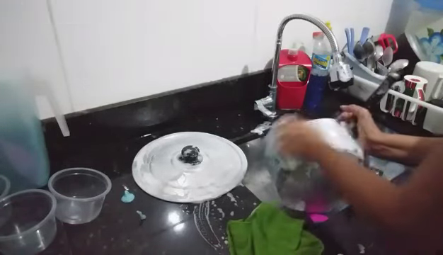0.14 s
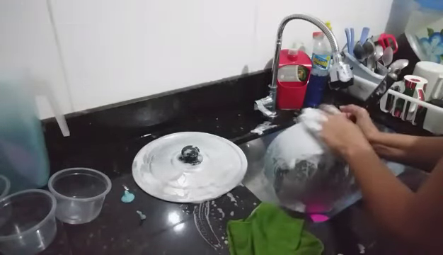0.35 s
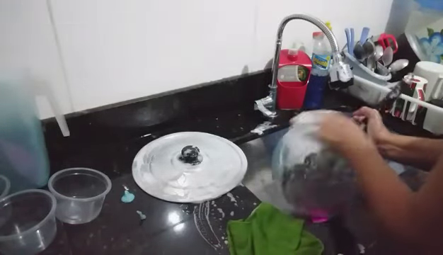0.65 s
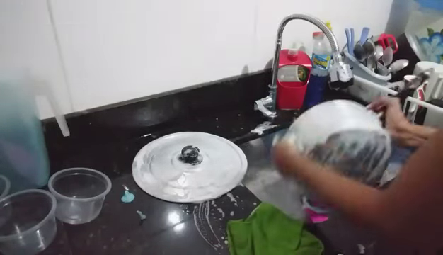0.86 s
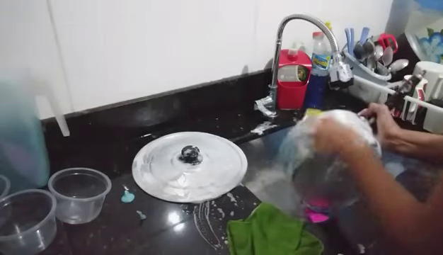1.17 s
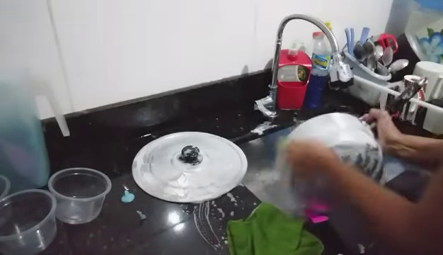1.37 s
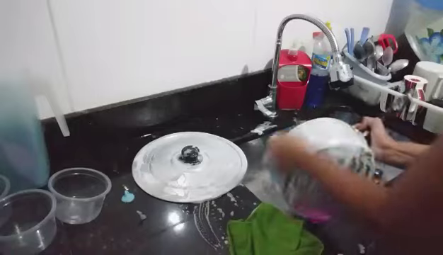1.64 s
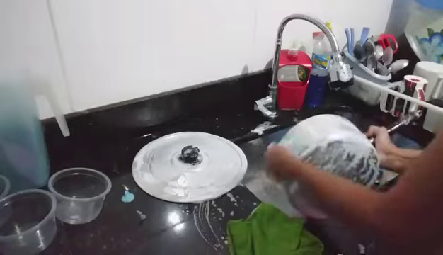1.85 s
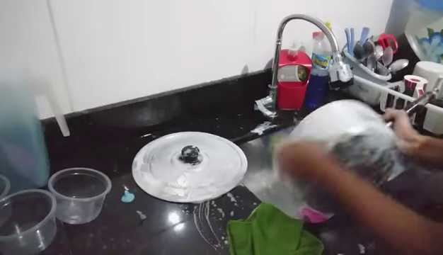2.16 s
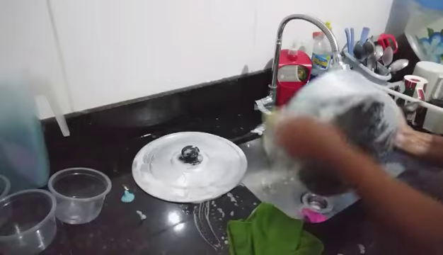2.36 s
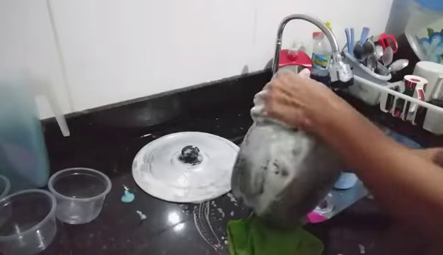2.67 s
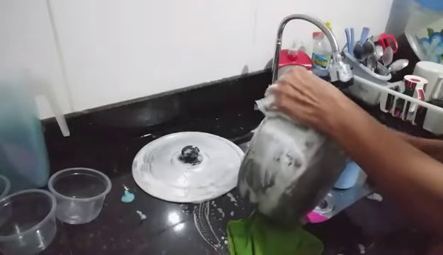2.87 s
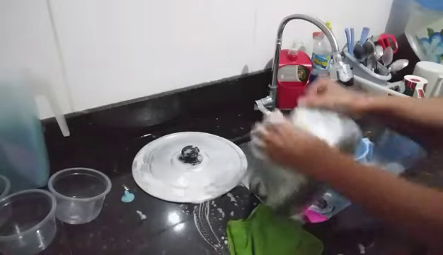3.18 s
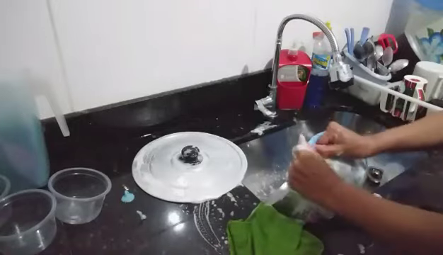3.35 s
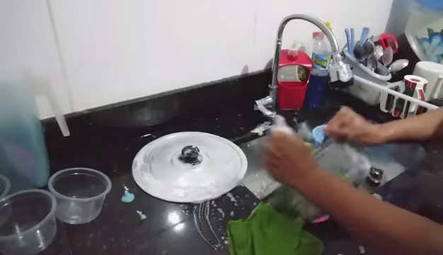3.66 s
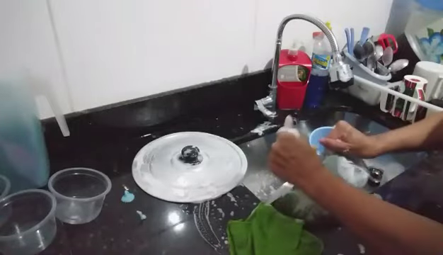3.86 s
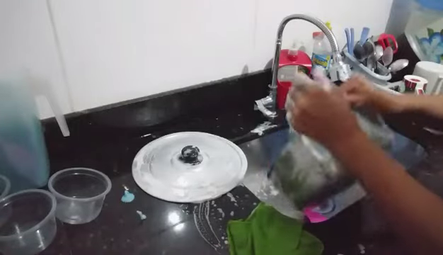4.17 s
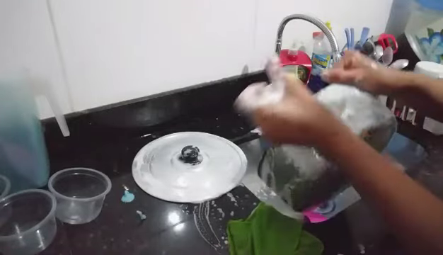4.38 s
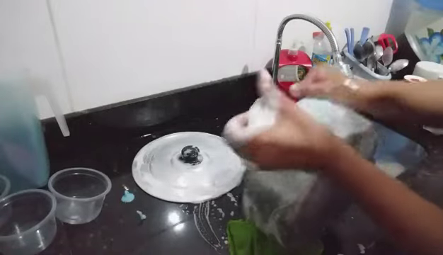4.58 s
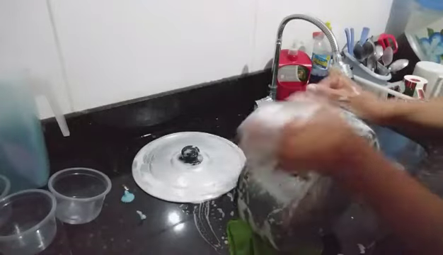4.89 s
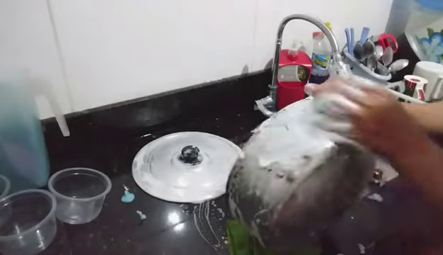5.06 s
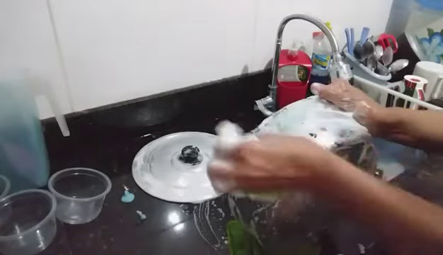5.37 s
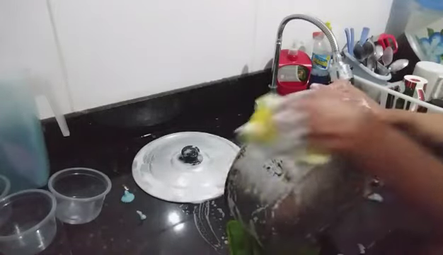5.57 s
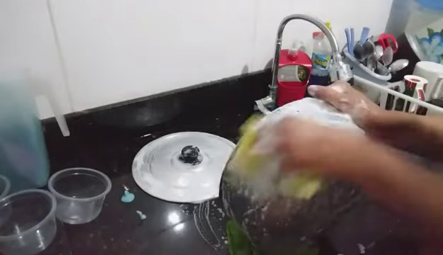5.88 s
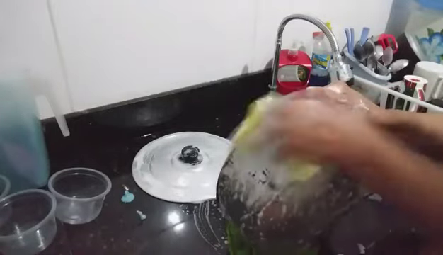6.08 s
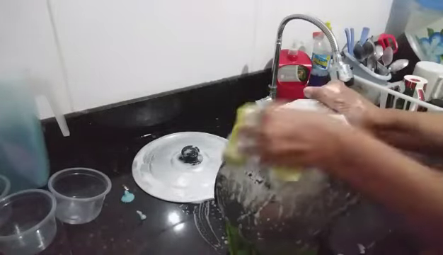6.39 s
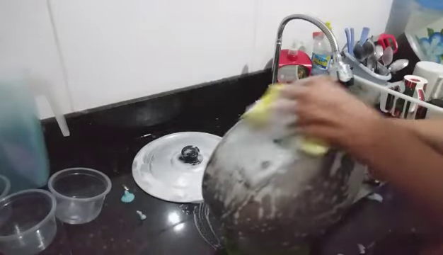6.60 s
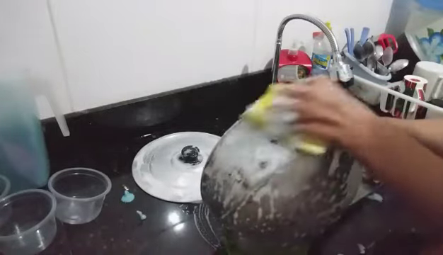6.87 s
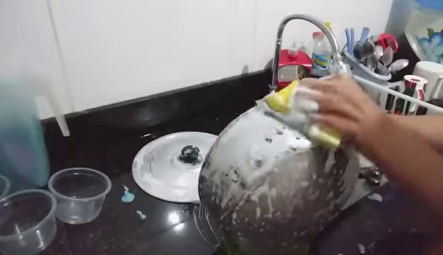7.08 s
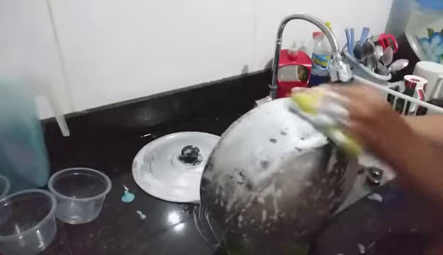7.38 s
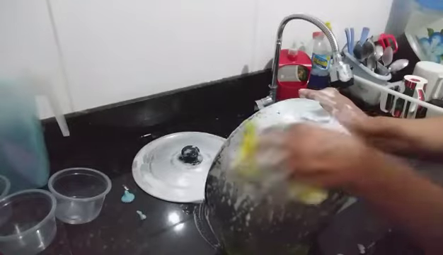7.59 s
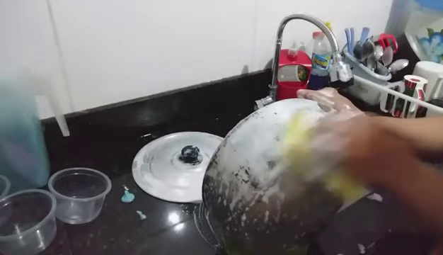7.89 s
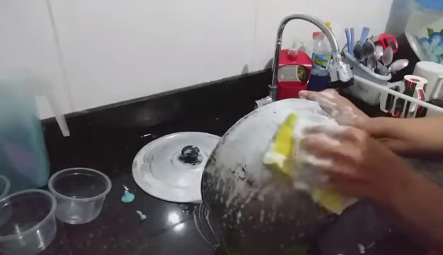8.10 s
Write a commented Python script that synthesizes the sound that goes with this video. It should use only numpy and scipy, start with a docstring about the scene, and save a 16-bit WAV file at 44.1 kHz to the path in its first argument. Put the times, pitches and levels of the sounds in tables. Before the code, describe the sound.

Soft foamy swishes on metal, roughly four or five a second, open the scene. One bright, hollow pot bang comes first, then a dense burst of blows and stick-slip rattling against the sink, ending in another clank. A quieter moment with a low thud follows, then short, rapid sponge strokes with a hollow metallic rub. Small tiled kitchen, short reverberation, close microphone, faint low hum.

```python
"""A soapy sponge rubs to and fro on an aluminium pot over a steel sink in a tiled kitchen.
The pot knocks the sink as it is turned, slips, skids into the basin, is lifted out and scrubbed again.
Blows excite the pot's modes and a dense clatter that the hard walls prolong; the skid is stick-slip
chatter with brief squeals. Sponge strokes are random clicks shaped into hiss, rubbing, fizz and a hollow
voice. Suds snap, soft thuds give body to some blows or sound alone, and hum and low noise fill the room."""
import sys
import numpy as np
from scipy import signal
from scipy.fft import rfft, irfft, next_fast_len
from scipy.io import wavfile

SR = 44100
rng = np.random.default_rng(int(sys.argv[2]) if len(sys.argv) > 2 else 0)


def master_out(mix):
    """Clip the mix to full scale and print it as 16-bit PCM to the path in sys.argv[1]."""
    frames = np.transpose(np.atleast_2d(mix))
    ceiling = np.clip(frames, -1, 1)
    pcm = np.round(ceiling * 32767).astype(np.int16)
    wavfile.write(sys.argv[1], SR, pcm)


N = 363384

# where and how the pot is struck: glance, wall, base, rim
STRIKE_SPOTS = ["glance", "wall", "base", "rim"]
# modes of the pot, before the factors for support and soap:
# frequency_hz, t60_s, glance_db, wall_db, base_db, rim_db
POT_MODES = [(263.5, 0.48, -25, -8.5, -35.5, -65.5), (351, 0.96, -12, -17, -14.5, -10.5),
             (389, 0.8, -2.5, -28.5, -18.5, -40), (440, 0.51, -0.5, -28, -24.5, -22),
             (502, 0.66, -8, -11, -22.5, -6), (519, 0.3, -6, -18.5, -17.5, -8),
             (560.4, 0.68, -6.5, 2.5, 3, 2), (585, 0.6, -15, -14.5, -9, 0.5),
             (645, 0.39, -21, -24, -5.5, -9.5), (767, 0.47, -21, -8, -32.5, -4),
             (808.0, 0.43, -20.5, -3.5, -27, -41), (848.5, 0.26, -23, -15.5, -28.5, -28),
             (903, 0.39, -25, -21.5, -27, -17), (980, 0.6, -13.5, -21, -24.5, -49),
             (1067, 0.59, -10.5, -18.5, -29.5, -24), (1117, 0.72, -22, -6, -26, -20),
             (1187, 0.57, -6, 1.5, -13, -5), (1216, 0.55, -2.5, -9, -15, 0),
             (1254, 0.55, -4, -1.5, -12, -18), (1670, 1, -12, -23.0, -19.5, -26),
             (1728, 0.66, -12.5, -16, -11.5, -9.5), (1757, 0.36, -14, -18, -15.5, -38),
             (1958, 0.63, -2, -21.5, -26, -32), (2070, 0.6, -6, -18, -32, -12.5),
             (2376, 0.48, -4.5, -31, -25.5, -13.5), (2412, 0.63, -6.5, -40.0, -23, -9.5),
             (2562, 0.2, -18.5, -14.5, -26.5, -40), (2592, 0.55, -6.5, -12, -20.5, -8),
             (2704, 0.42, -18, -30.0, -27, -28), (2720, 0.5, -17.5, -20.5, -27.5, -19),
             (2960, 1, -12, -28, -35.5, -30), (3170, 0.6, -10.5, -12.5, -32, -45),
             (3200, 0.43, -22.0, -13.5, -21.5, -31), (3280, 0.63, -9, -35, -25.5, -58),
             (3430, 0.29, -13, -31, -36.5, -61), (3955, 0.71, -12.5, -26.5, -29, -10),
             (4050, 0.62, -16.5, -13.5, -39, -60), (4170, 0.42, -18.5, -19, -30, -48),
             (4320, 0.73, -13, -23, -22.5, -22), (4815.0, 0.6, -23.5, -28.5, -33, -13),
             (5080, 0.52, -21.5, -30.5, -45.5, -16), (5120, 0.38, -14.5, -18, -41.5, -16),
             (5630, 0.24, -22.5, -23, -27.5, -48), (5980, 0.23, -29.5, -30, -25.5, -13.5),
             (6360, 0.55, -15.5, -27, -44.5, -41), (7160, 0.57, -29.5, -27.5, -33.5, -27),
             (8400, 0.35, -24.5, -27, -49.0, -59)]
# relative spectrum of the clatter between the modes:
# frequency_hz, glance_db_per_hz, wall_db_per_hz, base_db_per_hz, rim_db_per_hz
CLATTER_SPECTRA = [(45.0, -20, -39.5, -33.5, -38), (85.0, -4, -38, -28, -13),
                   (150.0, -8.5, -20.5, -17.5, -9), (276, -10, -13.5, -11, -17), (555, -6.5, -5.5, 0, 0),
                   (1350, -3, -8, -14.5, -12), (1500.0, -8.5, -19.5, -16, -15),
                   (2200.0, -6, -26.5, -30.0, -22.5), (3200.0, -5, -19, -25.5, -21.5),
                   (4230, -7.5, -27.5, -22.5, -22.5), (6300.0, -12.5, -28, -29.0, -23.5),
                   (8150, -16.5, -30.5, -31, -26), (8740, -22, -37, -40, -35.5),
                   (15000.0, -27.5, -44.5, -53.5, -43)]
# the low modes last longer when the pot hangs free than when it lies in the basin:
# t60_factor, one for each strike spot
LOW_MODE_SUSTAIN = [0.83, 1.165, 0.77, 1.31]
# decay of the early sound between the walls: frequency_hz, t60_s
KITCHEN_DECAY = [(80, 0.91), (250, 0.95), (600, 0.75), (1500, 0.68), (4000, 0.66), (8000, 0.58),
                 (15000, 0.8)]
# blows on the pot: start_s, spot, level_db, modes_to_clatter_db, sink_boom_db,
# brightness_db_per_octave, quick_first_decay_db, contact_time_s
POT_BLOWS = [ (.091, "glance", -64.5, 0, 16, 1.5, -14, .001),
             (0.3998, "glance", -50.5, 1, 7.5, 1.1, -6, 0.00083),
             (1.6439, "glance", -47, -2, 2, 0.23, -6, .0007),
             (2.347, "wall", -28.5, 3.5, 8.5, 1.34, 2.5, .0005),
             (3.203, "glance", -56, -3, -5, 3, 4, .0004), (3.3184, "glance", -36, -4, 6.5, -2, 2, .0007),
             (3.389, "glance", -43, -4.5, 10, 0, -1, .003),
             (3.419, "glance", -47.5, -7.5, 8, 2, -0.5, .004), (3.484, "base", -27, 2, 2, 0.5, 1, 0.00082),
             (3.499, "base", -37, -7.5, 2, 3, 4, .01), (3.517, "base", -29, 7.5, -0.5, 1.26, 10, 0.013),
             (3.553, "wall", -42.5, 6, 2.5, -0.7, 5.5, .012),
             (3.568, "base", -37.5, 5.5, 1, -0.5, 4.5, .012),
             (3.725, "base", -46.5, 2.5, -15, -2.5, -9, 0.018), (3.810, "base", -63, 11, 26, -2, 0, .003),
             (3.918, "glance", -54.5, -4, 2, -5, 16, .001),
             (3.9573, "rim", -34, 1.5, -17, -2.5, 11.5, 0.00047),
             (4.006, "rim", -44.5, 0, 0, 0, -12, 0.0074), (5.447, "glance", -71, -7, 0, -0.5, 7, .002),
             (7.486, "glance", -64, -17, -21.5, -0.5, 21, .0005)]
# soft low and hollow thuds, some giving body to a blow on the pot, some alone:
# start_s, level_db, centre_hz, width_octaves, rise_s, t60_s
SOFT_THUDS = [(0.089, -69.5, 423, 0.35, 0.0046, 0.85), (.401, -57.5, 478, 0.14, 0.0029, 1.1),
              (0.499, -62.5, 210, 0.35, 0.03, 0.74), (1.219, -74.5, 194, 0.5, .04, 0.38),
              (1.648, -59, 100.6, 0.096, 0.006, 0.37), (1.648, -59.5, 331, 0.27, .004, .7),
              (2.765, -62, 122.8, 0.21, 0.01, 0.3), (2.795, -57, 124, 0.08, .012, 0.13),
              (2.841, -60, 57.94, 0.19, .04, 2.4), (3.324, -46, 84, 0.17, .02, 0.71),
              (3.49, -48, 179.8, 0.31, 0.013, 0.33), (3.99, -55, 124, 0.3, 0.0089, 0.25),
              (4.748, -72, 200, 0.46, .012, 0.51), (4.786, -68.5, 126.7, 0.092, 0.018, 0.18),
              (6.34, -76.5, 190, .45, 0.044, 1.3)]
# strength of the skid on the steel: time_s, level_db
SKID_LEVEL = [(3.19, -60.5), (3.25, -41), (3.31, -44), (3.35, -31), (3.47, -28), (3.60, -40.5),
              (3.70, -47.5), (3.79, -46.5), (3.94, -66)]
# glides of wet metal as it starts to slide, one list for each squeal: time_s, pitch_hz, level_db
SQUEAL_GLIDES = [
    [(3.205, 2010, -56.5), (3.235, 2060, -54), (3.26, 1990, -46.5), (3.32, 1965, -48.5)],
    [(3.235, 1770, -56), (3.27, 1700, -51), (3.295, 1550, -44), (3.32, 1490, -47)],
]
# relative spectrum of the skid's rasp: frequency_hz, level_db_per_hz
RASP_SPECTRUM = [(30, -26), (90, -3), (250, 0), (450, 2.5), (1200, -6.0), (1600, -14.5),
                 (4200, -15), (8000, -26), (15000, -36.5)]
# sponge strokes, levels before the trim of each layer:
# start_s, length_s, foam_hiss_db, metal_rub_db, hollow_base_db
SPONGE_STROKES = [ (0, 0.041, -51, -56.5, -62.5), (0.104, 0.14, -53.5, -58, -64),
                  (.255, 0.13, -53.5, -64, -76), (0.396, 0.2, -56.5, -59, -60),
                  (0.57, 0.14, -55.5, -64, -68), (0.732, 0.15, -53, -64, -71),
                  (0.935, 0.1, -56.5, -67.5, -92), (1.015, 0.073, -55.5, -62.5, -62),
                  (1.13, 0.19, -57.5, -66, -69), (1.35, 0.13, -58, -68, -82),
                  (1.505, 0.12, -57.5, -69.5, -82), (1.64, 0.18, -57.5, -73, -75),
                  (1.797, 0.18, -57, -61, -78), (2.017, 0.15, -54, -62, -68), (2.232, 0.19, -59, -72, -77),
                  (2.52, 0.19, -58.5, -59, -73), (2.687, .14, -58, -64.5, -62),
                  (2.918, 0.12, -66.5, -71, -81), (3.026, 0.15, -63.5, -71, -72),
                  (3.157, 0.3, -54.5, -67, -81), (3.799, 0.063, -62.5, -53, -70),
                  (4.734, 0.089, -64, -71, -83), (4.869, 0.18, -72.5, -77, -97),
                  (5.052, 0.11, -71, -75, -70), (5.148, .06, -63, -70, -70.5),
                  (5.205, 0.095, -62, -62.5, -64), (5.317, 0.091, -60.5, -67, -85),
                  (5.416, 0.05, -59.5, -65.5, -69.5), (5.51, .10, -67.5, -71, -84),
                  (5.638, 0.097, -55.5, -61.5, -75), (5.721, 0.093, -53.5, -60.5, -64),
                  (5.878, 0.11, -55.5, -66, -71), (5.99, .06, -57.5, -61.5, -78),
                  (6.058, 0.12, -53, -59, -65), (6.186, 0.12, -54.5, -57.5, -66),
                  (6.333, 0.092, -52.5, -54.5, -54.5), (6.466, 0.11, -54.5, -57, -59.5),
                  (6.601, 0.095, -53, -56, -63), (6.758, 0.095, -56, -60, -71),
                  (6.889, 0.083, -55.5, -58, -61.5), (7.028, 0.094, -56.5, -58, -57.5),
                  (7.148, 0.095, -55, -58.5, -58), (7.275, 0.067, -57.5, -61.5, -62),
                  (7.319, 0.085, -54, -59.5, -72), (7.432, 0.095, -52.5, -55, -59),
                  (7.55, 0.13, -54, -63.5, -68), (7.657, 0.11, -52, -67, -61),
                  (7.767, 0.099, -53, -60.5, -63.5), (7.925, 0.1, -55, -63, -66),
                  (8.053, 0.068, -52.5, -58, -65), (8.19, 0.076, -58, -62.5, -70.5)]
# relative spectrum of the foam: frequency_hz, level_db_per_hz
HISS_SPECTRUM = [(1500, -31.5), (2800, -7.5), (3700, -1.5), (5200, -1), (6500, -1.5), (7300, -3.5),
                 (8100, -0.5), (9000, -12.5), (11000, -37.5)]
# relative spectrum of fibres on the metal: frequency_hz, level_db_per_hz
RUB_SPECTRUM = [(500, -30.5), (1000, -5.5), (1450, -3), (1770, -2), (2150, -3), (2500, -4), (2900, -8),
                (4000, -20.5)]
# relative spectrum of the finest fizz: frequency_hz, level_db_per_hz
FIZZ_SPECTRUM = [(6000, -28), (8200, -1.5), (9000, -5.5), (10200, 1), (12500, 0), (15500, -4)]
# relative spectrum of the pot's body under the sponge: frequency_hz, level_db_per_hz
BODY_SPECTRUM = [(100, -14.5), (200, -13.5), (330, -19), (440, -15), (520, -2.5), (630, -6.5), (760, -1.5),
                 (900, -5.5), (1080, -1), (1240, -0.5), (1400, -4), (2200, -23.5)]
# small wet snaps of suds, before a common trim: start_s, level_db
SUDS_SNAPS = [(0.9717, -42), (1.2196, -43), (5.2325, -45), (7.4885, -37), (7.676, -46), (7.7353, -40)]
# relative spectrum of a snap: frequency_hz, level_db_per_hz
SNAP_SPECTRUM = [(300, -15.5), (1300, -12), (5000, 7.0), (8000, -1), (15000, -14)]
# hum in the room, about which the level wavers: frequency_hz, level_db
HUM_TONES = [(60, -74), (119.5, -73.5)]
# relative spectrum of the room noise: frequency_hz, level_db_per_hz
ROOM_SPECTRUM = [(20, -44), (38, -30), (55, 2.5), (80, -4.5), (140, -12.5), (250, -18), (600, -19),
                 (2000, -37.5), (8000, -44.5), (15000, -49)]

ROOM_NOISE_DB = -68.5
CUTOFF_HZ = 15650
TIME = np.arange(N) / SR
RING_T = np.arange(int(1.1 * SR)) / SR
GRID_HZ = np.arange(0, SR / 2, 4)
# a stroke swells as the hand speeds up, is loudest midway, and fades after the hand turns
STROKE_ATTACK_S, STROKE_ARCH_DB = .016, 1.5
HISS_FADE_DB_PER_S, RUB_FADE_DB_PER_S = 105, 101
FIZZ_FADE_DB_PER_S, HOLLOW_FADE_DB_PER_S = 130, 89.5
# fizz gains on the hiss in brisk strokes, by FIZZ_GROWTH dB per dB above an ordinary stroke
ORDINARY_STROKE_DB, FIZZ_GROWTH = -54, .35
# the thin base answers with one hollow resonance; HOLLOW_DRIFT is its rms drift as a share of pitch
HOLLOW_HZ, HOLLOW_DRIFT = 715, .05
# the low middle lingers in the room after the first echoes
LINGER_DB, LINGER_T60_S, LINGER_TOP_HZ = -24, 1.35, 1250


def handling():
    """Impact excitation: blows drive the pot's modes, and soft thuds add body or sound alone."""
    out = np.zeros(N)
    fine_db = resonances(peak_db=2.5, width_hz=16, ripple_db=3.5)
    for start_s, *strike in POT_BLOWS:
        add(out, start_s, blow(fine_db, *strike))
    for start_s, *shape in SOFT_THUDS:
        add(out, start_s, thud(*shape))
    return out


def blow(fine_db, spot, level_db, ring_db, boom_db, tilt_db, quick_db, contact_s,
         quick_t60=0.43, crack_db=2, crack_s=.004):
    """Two-stage decay: a contact crack and clatter die quickly at first, beside the modal ring."""
    spectrum = np.array(CLATTER_SPECTRA)[:, [0, 1 + STRIKE_SPOTS.index(spot)]]

    def clatter_db(f):
        tilt = tilt_db * np.log2((f + 50) / 1000)
        boom = boom_db / (1 + (f / 180) ** 2)
        return read(spectrum, f) + np.interp(f, GRID_HZ, fine_db) + tilt + boom

    clatter = dying(colour(rng.standard_normal(len(RING_T)), clatter_db))
    clatter += amp(crack_db) * high_pass(clatter, hz=2500) * np.exp(-RING_T / crack_s)
    onset = 1 - np.exp(-RING_T / contact_s)
    shape = (1 + amp(quick_db - 60 * RING_T / quick_t60)) * onset
    # the ring carries no deep bass
    ring = high_pass(pot_ring(spot, tilt_db) * shape, hz=204)
    return amp(level_db) * (one_second(clatter * shape) + amp(ring_db) * one_second(ring))


def pot_ring(spot, tilt_db, scatter_hz=38, scatter=1.0, build_s=0.028, soapy=0.93):
    """Modal superposition: modes start clean, then wall echoes make them flutter, high ones most."""
    out = np.zeros(len(RING_T))
    steps = RING_T[::64]  # the slow envelopes need only a coarse time grid
    place = STRIKE_SPOTS.index(spot)
    for hz, t60, *levels in POT_MODES:
        low = 1 / (1 + (hz / 1400) ** 4)
        # the film of soap damps the high modes
        lasts = t60 * (low * LOW_MODE_SUSTAIN[place] + (1 - low) * soapy)
        rate = scatter_hz * np.sqrt(hz / 1000)
        # eight echoes, each with its own small frequency shift and phase
        cycles = rate * rng.uniform(-1, 1, (8, 1)) * steps + rng.random((8, 1))
        echoes = np.exp(2j * np.pi * cycles).sum(0) / np.sqrt(8)
        build_up = 1 - np.exp(-steps / build_s)
        voice = 1 + scatter * np.sqrt(hz / 1000) * echoes * build_up
        voice *= amp(-60 * steps / lasts)
        voice *= amp(levels[place] + tilt_db * np.log2(hz / 1000)) / np.linalg.norm(voice)
        flutter_phase = np.interp(RING_T, steps, np.unwrap(np.angle(voice)))
        angle = np.float32(2 * np.pi * (hz * RING_T + rng.random()) + flutter_phase)
        out += np.interp(RING_T, steps, abs(voice)) * np.sin(angle)
    return one_second(out)


def thud(level_db, centre_hz, octaves, rise_s, t60):
    """Damped broad resonance: noise around one centre rises and decays exponentially."""

    def hump_db(f):
        return -30 * np.log10(1 + (np.log2((f + 1) / centre_hz) / octaves) ** 2 / 2)

    boom = colour(rng.standard_normal(len(RING_T)), hump_db)
    shape = (1 - np.exp(-RING_T / rise_s)) * amp(-60 * RING_T / t60)
    return amp(level_db) * one_second(boom * shape)


def skid(ring_db=-5):
    """Stick-slip friction: chatter of metal on metal rings the pot, joined by brief squeals."""
    sliding = (TIME > SKID_LEVEL[0][0]) * (TIME < SKID_LEVEL[-1][0])
    slips = grains(per_s=4400, spread_db=1.5) * amp(follow(SKID_LEVEL)) * sliding
    ring = pot_ring("base", tilt_db=2.0) * amp(-60 * RING_T / 0.23)
    rasp = colour(rng.standard_normal(len(RING_T)), lambda f: read(RASP_SPECTRUM, f))
    rasp *= amp(-60 * RING_T / 0.24)
    response = rasp / np.linalg.norm(rasp) + amp(ring_db) * ring / np.linalg.norm(ring)
    chatter = signal.fftconvolve(slips, response)[:N]
    return chatter + in_kitchen(squeals(), wet_db=-2.5)


def squeals(waver=0.0088):
    """Frictional self-oscillation: wet metal sings gliding tones of unsteady pitch."""
    out = np.zeros(N)
    for rows in SQUEAL_GLIDES:
        s, hz, db = np.transpose(rows)
        t = np.arange(s[0], s[-1], 1 / SR)
        pitch = np.interp(t, s, hz) * (1 + waver * wander(len(t), rate_hz=300))
        tone = np.sqrt(2) * np.sin(2 * np.pi * np.cumsum(pitch) / SR)
        add(out, s[0], amp(np.interp(t, s, db)) * tone * signal.windows.tukey(len(t), .2))
    return out


def sponge(hiss_db=0.7, rub_db=1.2, fizz_db=-3.5, body_db=-1.16, hollow_db=-2, flutter_db=0.0):
    """Granular friction: fibres catch and foam bursts; one uneven grip can shake all layers."""
    hiss, rub, hollow = np.transpose(SPONGE_STROKES)[2:]
    fizz = hiss + FIZZ_GROWTH * (hiss - ORDINARY_STROKE_DB)
    pressing = stroking(hollow, HOLLOW_FADE_DB_PER_S)
    peaks = resonances(peak_db=3, width_hz=22, ripple_db=2.5)  # the hand damps the pot

    def layer(clicks, spectrum, loudness):
        """Source and filter: clicks pass through a spectrum and the pot's resonances."""
        coloured = colour(clicks, lambda f: read(spectrum, f) + np.interp(f, GRID_HZ, peaks))
        return unit(coloured) * loudness

    hiss_loudness = stroking(hiss + hiss_db, HISS_FADE_DB_PER_S)
    rub_loudness = stroking(rub + rub_db, RUB_FADE_DB_PER_S)
    fizz_loudness = stroking(fizz + fizz_db, FIZZ_FADE_DB_PER_S)
    out = layer(grains(per_s=16000, spread_db=0.9), HISS_SPECTRUM, hiss_loudness)
    out += layer(grains(per_s=7000, spread_db=1.0), RUB_SPECTRUM, rub_loudness)
    out += layer(grains(per_s=11000, spread_db=0.0), FIZZ_SPECTRUM, fizz_loudness)
    out += layer(grains(per_s=3900, spread_db=1.5), BODY_SPECTRUM, pressing * amp(body_db))
    # the resonance of the base shifts as the hand moves over it
    catches = grains(per_s=5700, spread_db=-1)
    hollow_hz = HOLLOW_HZ * (1 + HOLLOW_DRIFT * wander(N, rate_hz=5))
    out += unit(resonate(catches, hollow_hz, width_hz=200)) * pressing * amp(hollow_db)
    # at 0 dB of flutter the grip is even
    return out * amp(flutter_db * wander(N, rate_hz=63))


def stroking(levels_db, fade_db_per_s):
    """Addition of powers: each stroke swells, arches and fades into the next."""
    power, t = np.zeros(N), RING_T
    for (start_s, length_s, *_), db in zip(SPONGE_STROKES, levels_db):
        arch = np.sin(np.pi * np.minimum(t / length_s, 1)) - 1
        shape_db = STROKE_ARCH_DB * arch - fade_db_per_s * np.maximum(t - length_s, 0)
        swell = np.minimum(t / STROKE_ATTACK_S, 1)
        add(power, start_s, (swell * amp(db + shape_db)) ** 2)
    return np.sqrt(power)


def suds(snap_db=-2, snap_s=.003):
    """Film rupture: larger bubbles snap under the fingers as short decaying noise bursts."""
    out, t = np.zeros(N), RING_T[:SR // 20]
    for start_s, db in SUDS_SNAPS:
        snap = unit(colour(rng.standard_normal(len(t)), lambda f: read(SNAP_SPECTRUM, f)))
        add(out, start_s, amp(db + snap_db) * snap * np.exp(-t / snap_s))
    return in_kitchen(out, wet_db=3.5)


def room(waver_db=2):
    """Stationary background: low coloured noise with hum tones of wavering amplitude."""
    hum = np.zeros(N)
    for hz, db in HUM_TONES:
        level = amp(db + waver_db * wander(N, rate_hz=6))
        hum += np.sqrt(2) * level * np.sin(2 * np.pi * hz * TIME)
    noise = unit(colour(rng.standard_normal(N), lambda f: read(ROOM_SPECTRUM, f)))
    return hum + amp(ROOM_NOISE_DB) * noise


def in_kitchen(x, wet_db):
    """Reverberation by convolution: adds a decaying noise tail for the echo of the walls."""
    tail = dying(rng.standard_normal(len(RING_T))) * np.minimum(RING_T / .008, 1)
    return x + amp(wet_db) * signal.fftconvolve(x, tail / np.linalg.norm(tail))[:len(x)]


def dying(noise):
    """Frequency-dependent absorption: bands fade between tiled walls; the low middle lingers."""
    hz, t, bands = signal.stft(noise, SR, nperseg=256)
    early = amp(-60 * t / read(KITCHEN_DECAY, hz)[:, None])
    late = amp(LINGER_DB - 60 * t / LINGER_T60_S) / (1 + (hz[:, None] / LINGER_TOP_HZ) ** 10)
    return signal.istft(bands * np.hypot(early, late), SR, nperseg=256)[1][:len(noise)]


def resonances(peak_db, width_hz, ripple_db):
    """Modal response in dB: peaks at the pot's modes, over a ripple that grows towards the treble."""
    peaks = [1 / (1 + ((GRID_HZ - mode[0]) / width_hz) ** 2) for mode in POT_MODES]
    fine = ripple_db * ripple(GRID_HZ) * GRID_HZ / (GRID_HZ + 700)
    return peak_db * np.max(peaks, axis=0) + fine


def ripple(hz, spacing_hz=45):
    """Modal density: countless weaker modes give the spectrum fine peaks and valleys."""
    knots = np.arange(0, SR / 2, spacing_hz)
    heights = rng.standard_normal(SR // 10)[:len(knots)]  # more draws than this spacing needs
    return np.interp(hz, knots, np.clip(heights, -2, 2))


def grains(per_s, spread_db):
    """Random impulse train: tiny clicks, of more unequal size the further spread_db is from zero."""
    size = amp(spread_db * np.minimum(rng.exponential(1, N), 4))
    return unit(rng.standard_normal(N) * size * (rng.random(N) < per_s / SR))


def wander(length, rate_hz):
    """Low-passed noise: random motion of rms one, mostly slower than rate_hz."""
    return unit(colour(rng.standard_normal(length), lambda f: -10 * np.log10(1 + (f / rate_hz) ** 6)))


def resonate(x, hz, width_hz):
    """Heterodyne resonance: shifts the curve hz to zero, low-passes there, and shifts back."""
    turn = np.exp(2j * np.pi * np.cumsum(hz) / SR)
    r = np.exp(-np.pi * width_hz / SR)
    return 2 * (turn * signal.lfilter([(1 - r) ** 2], [1, -2 * r, r * r], x / turn)).real


def colour(x, db_at):
    """Linear filtering: weights the spectrum by a function from Hz to dB."""
    size = next_fast_len(len(x))
    gain = amp(db_at(np.fft.rfftfreq(size, 1 / SR)))
    return irfft(rfft(x, size) * gain, size)[:len(x)]


def high_pass(x, hz):
    """Second-order high-pass: weakens what lies below hz."""
    return signal.sosfilt(signal.butter(2, hz, "high", fs=SR, output="sos"), x)


def read(points, hz):
    """Interpolation of a spectrum on a logarithmic frequency axis."""
    f, value = np.transpose(points)
    return np.interp(np.log(hz + 1), np.log(f + 1), value)


def follow(rows, column=1):
    """Linear interpolation of one column at every sample."""
    rows = np.array(rows)
    return np.interp(TIME, rows[:, 0], rows[:, column])


def amp(db):
    """Decibel law: amplitude ratio of a level."""
    return 10 ** (np.asarray(db) / 20)


def unit(x):
    """Power normalisation to an rms of one."""
    return x / np.sqrt(np.mean(x ** 2) + 1e-20)


def one_second(x):
    """Energy normalisation to that of one second at an rms of one."""
    return x / np.sqrt(np.sum(x ** 2) / SR + 1e-20)


def add(mix, start_s, sound):
    """Superposition: mixes a sound in, in place, from start_s."""
    part = mix[max(round(start_s * SR), 0):][:len(sound)]
    part += sound[:len(part)]


def scene():
    """Superposition of all sources, from the pot to the background."""
    return (handling() + skid() + sponge() + suds() + room())[None]


def record(dry):
    """Microphone response: weak deep bass, rounded loudest peaks, then a band limit."""
    thin = high_pass(dry, hz=42)
    limited = thin / (1 + thin ** 6) ** (1 / 6)
    band_limit = signal.firwin(511, CUTOFF_HZ, window=("kaiser", 9), fs=SR)
    return signal.oaconvolve(limited, band_limit[None], "same")


dry = scene()
out = record(dry)
master_out(out)
```